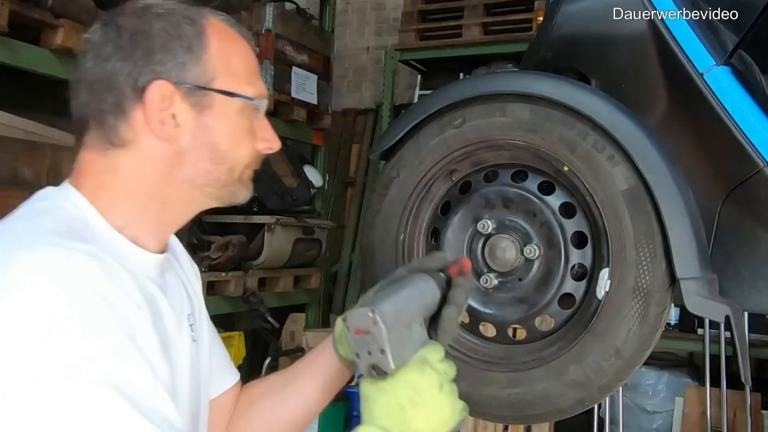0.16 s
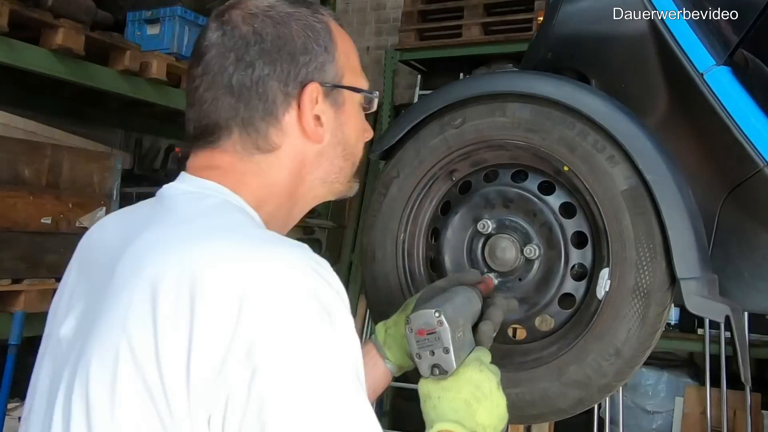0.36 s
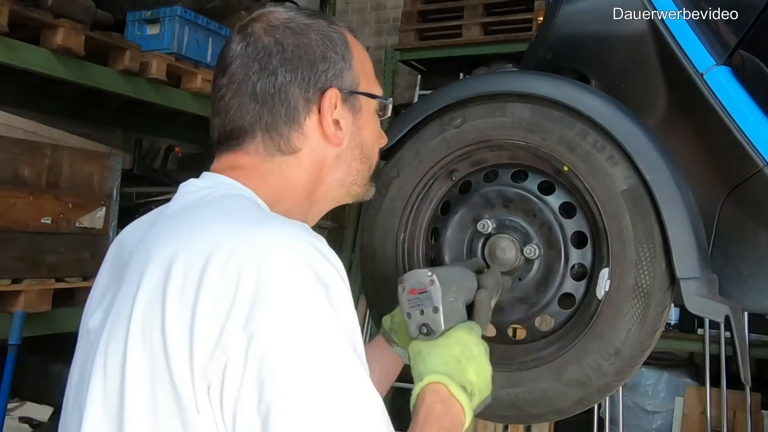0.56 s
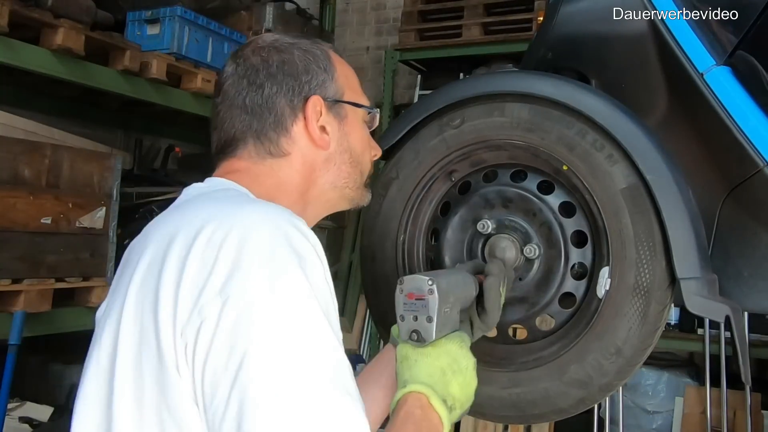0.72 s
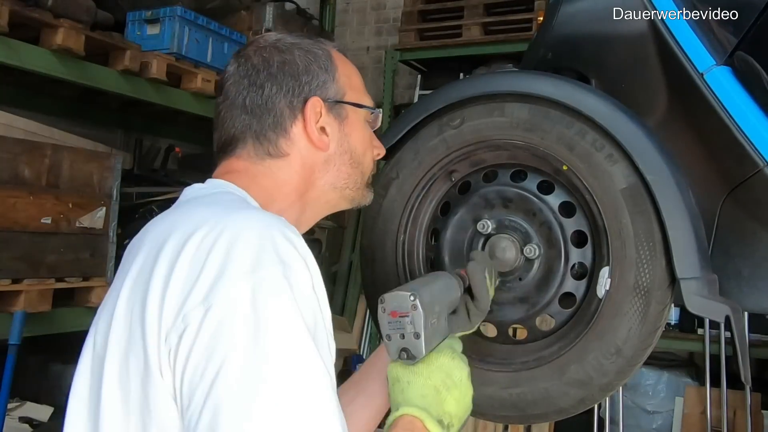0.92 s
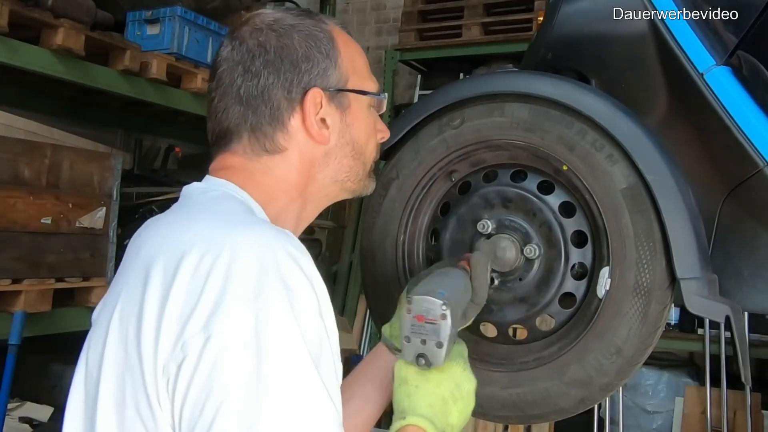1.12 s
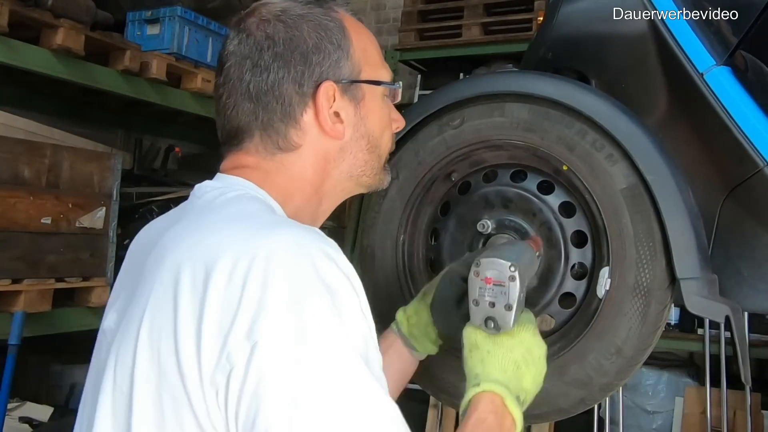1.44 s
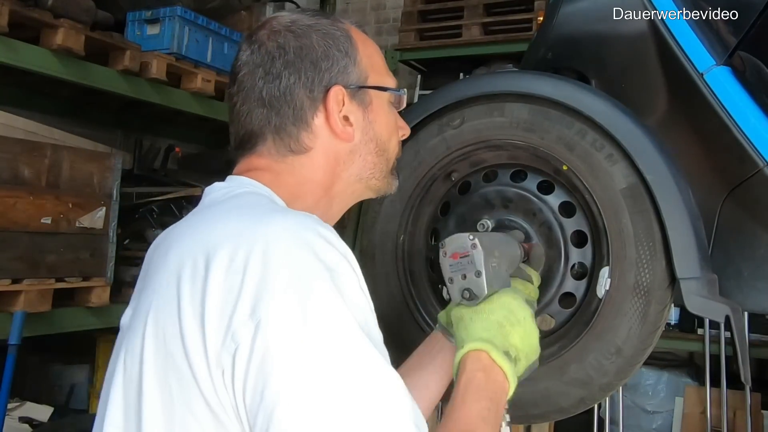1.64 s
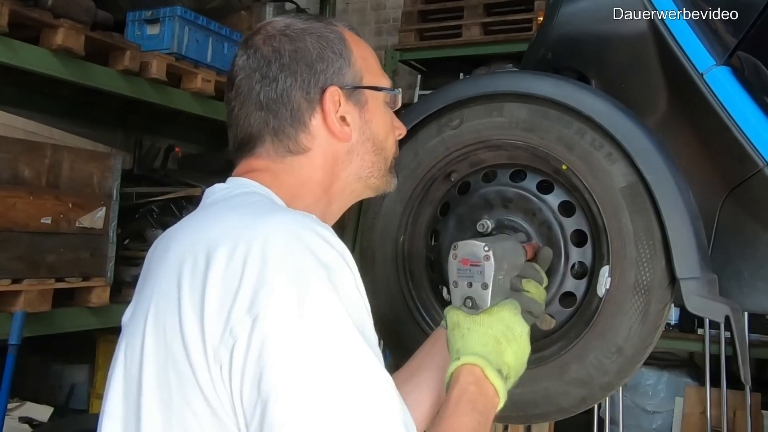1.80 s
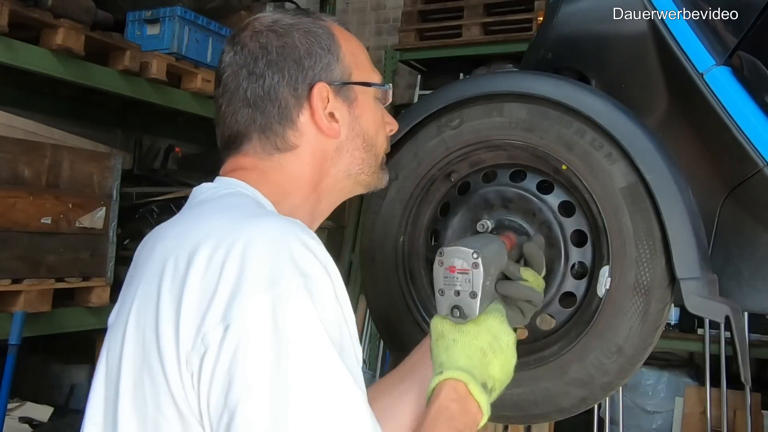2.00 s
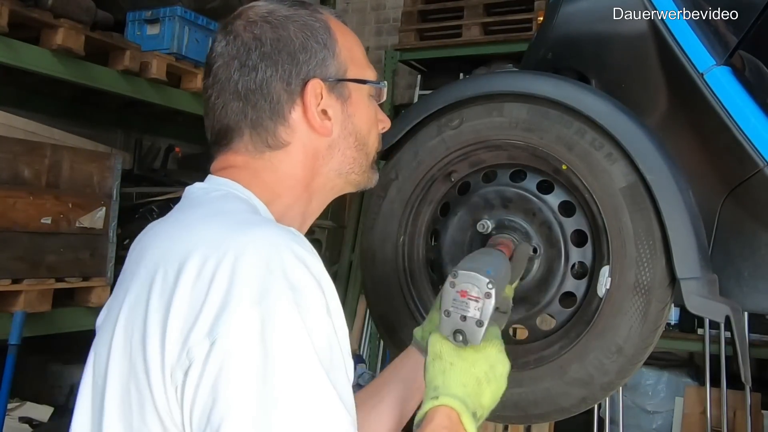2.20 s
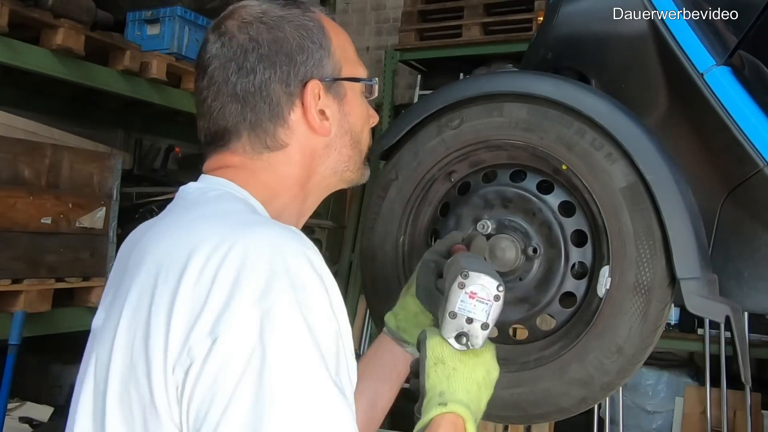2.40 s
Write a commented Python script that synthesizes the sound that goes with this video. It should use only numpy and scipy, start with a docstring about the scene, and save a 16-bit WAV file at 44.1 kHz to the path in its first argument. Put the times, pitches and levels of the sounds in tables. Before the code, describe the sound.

Two brief hammering, whining bursts from a cordless impact wrench, with light metal knocks beforehand.

```python
"""A cordless impact wrench, close to the microphone, spins two wheel bolts loose in a reverberant garage.
The socket clicks and knocks onto each bolt; the motor kicks in and the hammer strikes the anvil four
hard blows, then rattles lightly as the motor whines up to speed and is braked to a stop.
Something clacks farther off. Rubbing, low rumble and soft hiss lie underneath, almost in mono."""
import sys
import numpy as np
from scipy import signal
from scipy.fft import rfft, irfft
from scipy.io import wavfile

SR = 44100
rng = np.random.default_rng(int(sys.argv[2]) if len(sys.argv) > 2 else 0)


def store_pcm(level_fs):
    """Save levels as 16-bit WAV."""
    pcm = np.round(np.clip(level_fs, -1, 1) * 32767).astype(np.int16)
    wavfile.write(sys.argv[1], SR, np.atleast_2d(pcm).T)


N = 112454
T = np.arange(N) / SR
HIT_T = T[:SR // 3]  # time within one hit

# hammer blows, close up (time [s], crack [dB], tilt [dB/octave], thump [dB], ring [dB], hold [s])
HAMMER_BLOWS = [(.6860, -12.5, -0.5, -29, -29, .005), (0.698, -17.5, -2, -28, -23, 0.0011),
                (0.7019, -2, -1, -10.5, -42, 0.0016), (0.7238, 1, -0.5, -24, -32, 0.0027),
                (0.7422, -7.5, 1, -32, -13, 0.00157), (0.755, -5, 0.5, -7.5, -19, 0.0027),
                (0.778, -11.5, 0, -26.5, -25, .002), (0.7996, -12, -2.5, -36, -38, .002),
                (0.822, -13, -1.5, -34, -34, .003), (.8454, -16.5, -0.5, -33, -35, 0.0029),
                (0.873, -24.5, 0, -27.5, -31, .002), (0.9025, -21.5, 3, -36, -30, 0.0013),
                (1.7587, -14.5, -2.5, -21.5, -19, 0.0058), (1.7741, 0, 2, -16.5, -19, 0.0036),
                (1.7977, -2.5, 0.5, -17, -9.5, 0.0019), (1.8148, -7.5, 1.5, -13.5, -31, .003),
                (1.8289, -9.5, -0.5, -14, -13, 0.0025), (1.8468, -17, 1, -27, -28, .002),
                (1.87, -14, -1.5, -25, -33, 0.0017), (1.8947, -17, 0, -32.5, -32, 0.0011),
                (1.919, -19, -2, -39, -36, 0.00083)]
# spectrum of the steel crack (frequency [Hz], level [dB])
CRACK_COLOUR = [(100, 0.5), (500, -1.5), (1000, -4.5), (1800, -6), (3000, -1), (4200, -3), (6000, -4.5),
                (9000, 3), (11500, 0), (13500, -1), (16000, 4)]
# modes of anvil and socket (frequency [Hz], level [dB], t60 [s])
ANVIL_MODES = [(6073, 3.5, 0.026), (6287, 1.5, 0.024), (7320, -4, .015), (8230, -3.5, .02),
               (9100, 1.5, 0.022), (9400, -6, 0.022), (11030, -4.5, .06), (14700, -15, .04)]
THUMP_HZ, THUMP_FALL_S, THUMP_BOOST_DB = 130.6, 0.0026, 3.5


def hammer():
    """Each blow on the anvil is a steel crack, a low recoil and the ring of anvil and socket."""
    out = np.zeros(N)
    thump = np.sin(2 * np.pi * THUMP_HZ * HIT_T) * np.exp(-HIT_T / THUMP_FALL_S)
    for s, crack_db, tilt_db, thump_db, ring_db, hold_s in HAMMER_BLOWS:
        crack = amp(crack_db) * burst(CRACK_COLOUR, hold_s, fall_s=0.0021, tilt_db=tilt_db)
        recoil = -amp(THUMP_BOOST_DB + thump_db) * thump
        anvil = amp(ring_db) * ring(ANVIL_MODES, spread=0.0101)
        add(out, s, crack + recoil + anvil)
    return out


# the motor's fundamental on each bolt (time [s], pitch [Hz], level [dB])
FIRST_RUN = [(.716, 319.2, -25), (.731, 418.7, -18), (.750, 522.6, -28), (.769, 718.6, -23.5),
             (.790, 882.5, -26), (.812, 970, -32.5), (.850, 1052, -34), (.897, 1164, -36.5),
             (.908, 1010, -28.5), (.930, 808.7, -22.5), (.948, 644.7, -20), (.970, 470, -25),
             (.990, 351.2, -25.5), (1.012, 254, -37), (1.05, 150, -53)]
SECOND_RUN = [(1.795, 299.4, -17), (1.809, 393.6, -21), (1.821, 469, -27), (1.839, 679.6, -22),
              (1.860, 855, -28), (1.878, 957.6, -29), (1.898, 1014, -31), (1.917, 1083, -40.5),
              (1.932, 968.4, -27.5), (1.960, 747, -22.5), (1.978, 604, -21.5), (2.000, 443, -25),
              (2.022, 337, -28.5), (2.060, 223, -40.5), (2.1, 140, -57)]
# overtones 2 to 7 (level at full power [dB], level against the fundamental while braking [dB])
OVERTONES = [(-36.5, -1.5), (-52, -7.5), (-36.5, -12.5), (-36.5, -14.5), (-42.5, -17), (-43, -20)]
# the casing's added colour on the overtones while braking (frequency [Hz], level [dB])
CASING_COLOUR = [(300, 0), (700, -14.5), (1200, -10), (1600, -5), (2050, -4), (2500, -1), (2900, 11),
                 (3350, -29.5), (4050, 8), (5400, -9), (7500, 2)]
# spectrum of the gear hiss (frequency [Hz], level [dB])
GEAR_COLOUR = [(100, 17), (400, -4.5), (1500, 8), (2800, 20), (4000, 12.5), (5500, 11.5), (9000, -10.5),
               (16000, -3.5)]
MOTOR_TRIM_DB, GEAR_DB = -2.5, -38
WOBBLE_DEPTH, WOBBLE_HZ, FLUTTER_DB, FLUTTER_HZ = 0.02185, 139.4, 3, 70


def motor(run):
    """A whine with overtones and gear hiss; it climbs under power and falls under the brake."""
    times, pitches, levels = np.transpose(run)
    hz = np.interp(T, times, pitches)
    level = amp(MOTOR_TRIM_DB + np.interp(T, times, levels))
    speed = hz / pitches.max()
    gate = np.clip((T - times[0]) / 0.0053, 0, 1) * np.clip((times[-1] - T) / 0.0069, 0, 1)
    braking = np.clip((T - times[pitches.argmax()]) / .008, 0, 1)
    roughness = 1 - 0.47 * braking  # steadier under the brake
    wobble = WOBBLE_DEPTH * roughness * wander(WOBBLE_HZ)
    phase = 2 * np.pi * np.cumsum(hz * (1 + wobble)) / SR
    whine = level * amp(FLUTTER_DB * roughness * wander(FLUTTER_HZ)) * np.sin(phase)
    for k, (drive_db, brake_db) in enumerate(OVERTONES, 2):
        driven = (1 - braking) * amp(drive_db) * speed ** 1.1
        braked = braking * level * amp(brake_db + read(CASING_COLOUR, k * hz))
        flutter = amp(FLUTTER_DB * wander(FLUTTER_HZ))
        whine += (driven + braked) * flutter * np.sin(k * phase + 2 * np.pi * rng.random())
    hiss = amp(GEAR_DB) * speed ** 1.2 * noise(GEAR_COLOUR, N) * (1 + .5 * np.sin(phase))
    return gate * (np.sqrt(2) * whine + hiss)


# jolts as the motor takes up the load (time [s], level [dB])
HOUSING_JOLTS = [(.690, -19), (0.7125, -4.5), (1.768, -16), (1.7843, -7)]
# modes of the housing (frequency [Hz], level [dB], t60 [s])
HOUSING_MODES = [(289, 2, 0.039), (397, -5.5, 0.0534), (571, -7, 0.087), (661.3, -4, .06)]
# gears under load (time [s], length [s], level [dB])
GEAR_LOADS = [(0.681, 0.081, -21.5), (1.755, 0.075, -20)]
# spectrum of their grinding (frequency [Hz], level [dB])
GRIND_COLOUR = [(25, 3), (60, -21.5), (140, -5.5), (300, 8.5), (650, 5), (1100, -0.5), (1700, -19),
                (3000, -11.5), (7000, -17.5), (16000, -18)]


def strain():
    """The housing jolts and the gears grind while the bolt still holds."""
    out = np.zeros(N)
    for s, db in HOUSING_JOLTS:
        add(out, s, -amp(db) * ring(HOUSING_MODES) * attack(0.0012))
    for s, length_s, db in GEAR_LOADS:
        onset = np.clip((T - s) / 0.0066 + .5, 0, 1)
        release = np.exp(-np.maximum(T - s - length_s, 0) / .012)
        out += amp(db) * noise(GRIND_COLOUR, N) * onset * release
    return out


# thin steel pings at the wheel (time [s], frequency [Hz], level [dB], t60 [s])
BOLT_CHINKS = [(.940, 8660, -27, 0.096), (.952, 11430, -23, .06), (.994, 12410, -41, .03),
               (1.972, 5240, -23, 0.043)]


def bolt_chinks():
    """The loosened bolt chinks in the slowing socket."""
    out = np.zeros(N)
    for s, hz, db, t60 in BOLT_CHINKS:
        add(out, s, ring([(hz, db, t60)]))
    return out


# knocks at the wheel (time [s], level [dB], tilt [dB/octave], ring [dB], rise [s])
SOCKET_KNOCKS = [(0.3782, -28.5, 3, -48, .0005), (0.3851, -4.5, 3.5, -8.5, 0.00044),
                 (.4050, -33, -12, -20, .002), (0.419, -25, -25, -16.5, 0.0027),
                 (0.4381, -10, 8, -15, 0.00016), (0.4986, -11.5, -3.5, -18, 0.0015),
                 (.5080, -14.5, -0.5, -20.5, 0.00053), (.521, -22.5, -6, -20, .001),
                 (.531, -26, 4, -30, .002), (0.5436, -21, 3.5, -37, 0.00081),
                 (0.6315, -13, -3, -12.5, 0.0015), (1.412, -33.5, -4, -51, 0.0014),
                 (1.6247, -12.5, -1.5, -18, 0.0002), (1.635, -20, -5, -42, .001),
                 (1.647, -24, -7.5, -48, 0.00093), (1.714, -26, -9, -42, 0.00074),
                 (1.720, -29.5, -8, -46, 0.00133)]
# spectrum of the contact (frequency [Hz], level [dB])
KNOCK_COLOUR = [(100, -12.5), (400, -17), (900, 2.5), (1400, 4.5), (1900, -4.5), (2600, -1), (3150, 7),
                (3900, -10.5), (5700, -6), (7200, -17.5), (9200, -18), (11000, -25.5), (16000, -27)]
# modes of the socket (frequency [Hz], level [dB], t60 [s])
SOCKET_MODES = [(1381, 2, 0.031), (1530, -10.5, 0.04), (2393, -8, 0.03), (3015, -10.5, 0.041),
                (3213, -6, .03), (1390, -47, 0.21), (3000, -23, 0.33)]


def socket_knocks():
    """The socket knocks on bolt and rim, and rings."""
    out = np.zeros(N)
    for s, db, tilt_db, ring_db, rise_s in SOCKET_KNOCKS:
        contact = amp(db) * burst(KNOCK_COLOUR, hold_s=0.0012, fall_s=0.0039, tilt_db=tilt_db)
        socket = amp(ring_db) * ring(SOCKET_MODES, spread=0.013)
        add(out, s, (contact + socket) * attack(rise_s))
    return out


# light clicks near the microphone (time [s], level [dB], tilt [dB/octave], fall [s])
HANDLING_CLICKS = [(.029, -35, -5.5, 0.0045), (.039, -25.5, -2, 0.0016), (0.09, -26.5, -6.5, 0.0017),
                   (0.167, -21.5, 1.5, 0.0015), (.941, -24, -1, 0.0063), (.955, -25.5, 2.5, 0.0043),
                   (0.9944, -20, 10, 0.0011), (1.008, -27.5, -1, 0.00171), (1.185, -19.5, 5, 0.00078),
                   (1.315, -24.5, 1, 0.0013), (1.395, -39, -4, 0.0078), (1.417, -36.5, -2, 0.011),
                   (1.496, -35, -6.5, 0.0027), (1.503, -37, -4.5, 0.0047), (1.568, -28, 0, .001),
                   (1.58, -27.5, -0.5, 0.0016), (1.696, -35, -6, 0.02), (1.9767, -22.5, 1, 0.0023),
                   (2.310, -34, -1.5, 0.0053)]
# spectrum of a click (frequency [Hz], level [dB])
CLICK_COLOUR = [(100, -28.5), (1000, -16), (3000, 1), (5500, 1.5), (10000, -0.5), (16000, 0.5)]


def handling_clicks():
    """Small parts click as the tool is handled."""
    out = np.zeros(N)
    for s, db, tilt_db, fall_s in HANDLING_CLICKS:
        click = burst(CLICK_COLOUR, hold_s=0.002, fall_s=fall_s, tilt_db=tilt_db)
        add(out, s, amp(db) * click * attack(0.00072))
    return out


# spectrum of the clack across the garage (frequency [Hz], level [dB])
CLACK_COLOUR = [(88, -25.5), (150, 2.5), (484, -1.5), (774, -8), (1390, -13), (3420, -3), (4490, -4.5),
                (7040, 0.5), (13400, -7.5), (16000, -13)]


def far_clack():
    """Something clacks farther from the microphone: a short hit with a softer tail."""
    out = np.zeros(N)
    hit = amp(-18) * burst(CLACK_COLOUR, hold_s=0.0022, fall_s=.004)
    tail = amp(-24.5) * burst(CLACK_COLOUR, hold_s=.004, fall_s=0.039)
    add(out, .217, hit + tail)
    return out


# the garage's reverberation time (frequency [Hz], t60 [s])
GARAGE_T60 = [(100, 0.01), (400, 0.2), (1000, 1.34), (2500, 1.8), (6000, 1.76), (10000, 1), (16000, 0.73)]
# colour of its tail (frequency [Hz], level [dB])
GARAGE_COLOUR = [(60, -15), (250, 4), (600, -3.5), (1200, -1.5), (2000, 2), (2900, -2), (3400, -6.5),
                 (5000, -2), (6200, -7.5), (8000, -6), (16000, 1)]
TAIL_DB, EARLY_DB, EARLY_FALL_S, REFLECTIONS_PER_S = -14, -15, 0.016, 1500


def garage(x):
    """Quick reflections from wheel and car body reach the microphone, then a long bright tail."""
    hz, t, spectrum = signal.stft(rng.standard_normal(SR * 3 // 2), SR, nperseg=256)
    spectrum *= amp(read(GARAGE_COLOUR, hz)[:, None] - 60 * t / read(GARAGE_T60, hz)[:, None])
    tail = signal.istft(spectrum, SR, nperseg=256)[1]
    tail *= np.minimum(T[:len(tail)] / 0.03, 1)
    early = rng.standard_normal(len(HIT_T)) * (rng.random(len(HIT_T)) < REFLECTIONS_PER_S / SR)
    early *= (HIT_T > .003) * np.exp(-HIT_T / EARLY_FALL_S)
    return amp(TAIL_DB) * reflect(x, tail) + amp(EARLY_DB) * reflect(x, early)


def wall_echo(x, delay_s=.06, fall_s=0.034, db=-16.5):
    """The far wall scatters back a late cluster of dull reflections."""
    out = np.zeros(N)
    cluster = rng.standard_normal(len(HIT_T)) * np.exp(-HIT_T / fall_s)
    dull = signal.sosfilt(signal.butter(2, [250, 800], "bandpass", fs=SR, output="sos"), x)
    add(out, delay_s, reflect(dull, cluster))
    return amp(db) * out


# course of the rubbing, the low rumble and the hiss (time [s], level [dB])
RUB_LEVEL = [(0, -58), (.36, -56), (.48, -37), (.55, -36.5), (.62, -44), (.67, -37.5), (.75, -73),
             (1.35, -80), (1.52, -55.5), (1.65, -45.5), (1.74, -45), (1.85, -75)]
RUMBLE_LEVEL = [(0, -35), (.3, -41.5), (.4, -44), (.66, -44), (.75, -49), (.88, -48), (.95, -72),
                (1.35, -63), (1.74, -55), (1.79, -33), (1.92, -56), (2.05, -72.5), (2.55, -64)]
HISS_LEVEL = [(0, -45), (.35, -42.5), (.7, -50), (1.3, -54.5), (2.55, -54.5)]
# their spectra (frequency [Hz], level [dB])
RUB_COLOUR = [(30, -10), (120, -3.5), (200, -8.5), (320, 2), (480, -14.5), (1000, -15.5), (3000, -32),
              (7000, -23), (16000, -34)]
RUMBLE_COLOUR = [(15, 1), (35, 8.5), (55, 3), (80, -10.5), (150, -25), (300, -23.5), (900, -49),
                 (4000, -90)]
HISS_COLOUR = [(59, -32), (100, -2.5), (328, -7.5), (570, -4.5), (721, -9), (970, -3.5), (1420, -8),
               (3190, -7.5), (16000, -16)]


def background():
    """Socket and gloves rub as the tool is lined up, over a room tone of low rumble and soft hiss."""
    layers = [(RUMBLE_LEVEL, RUMBLE_COLOUR), (RUB_LEVEL, RUB_COLOUR), (HISS_LEVEL, HISS_COLOUR)]
    return sum(amp(np.interp(T, *np.transpose(level))) * noise(colour, N) for level, colour in layers)


def amp(db):
    """Decibels to gain."""
    return 10 ** (np.asarray(db) / 20)


def unit(x):
    """Scales to rms 1."""
    return x / np.sqrt(np.mean(x ** 2) + 1e-20)


def read(points, hz):
    """Reads a table on a log-frequency axis."""
    frequencies, values = np.transpose(points)
    return np.interp(np.log(hz + 1), np.log(frequencies + 1), values)


def add(mix, s, sound):
    """Mixes a sound in at time s."""
    part = mix[max(round(s * SR), 0):][:len(sound)]
    part += sound[:len(part)]


def noise(colour, size, tilt_db=0):
    """Coloured noise of rms 1, tilted by tilt_db per octave above 700 Hz."""
    hz = np.fft.rfftfreq(size, 1 / SR)
    gain = amp(read(colour, hz) + tilt_db * np.log2(np.maximum(hz, 700)))
    return unit(irfft(rfft(rng.standard_normal(size)) * gain, size))


def wander(hz):
    """Random drift of rms 1, low-passed at hz."""
    return unit(signal.sosfilt(signal.butter(2, hz, fs=SR, output="sos"), rng.standard_normal(N)))


def attack(rise_s):
    """The linear onset of a hit."""
    return np.minimum(HIT_T / rise_s, 1)


def burst(colour, hold_s, fall_s, tilt_db=0):
    """Contact noise: sharp attack, short hold, exponential fall."""
    envelope = attack(0.00048) * np.exp(-np.maximum(HIT_T - hold_s, 0) / fall_s)
    return envelope * noise(colour, len(HIT_T), tilt_db)


def ring(modes, spread=0.0074):
    """Dying modes, tuned a little differently at every blow."""
    out = np.zeros(len(HIT_T))
    for hz, db, t60 in modes:
        detuned_hz = hz * (1 + spread * rng.standard_normal())
        out += amp(db - 60 * HIT_T / t60) * np.sin(2 * np.pi * detuned_hz * HIT_T)
    return out


def reflect(x, echoes):
    """Convolves a sound with echoes scaled to unit energy."""
    return signal.fftconvolve(x, echoes / np.linalg.norm(echoes))[:N]


# faint phase-shifted copy that slightly widens the near-mono image (frequency [Hz], level [dB])
SHIFTED_COPY = [(60, -23.5), (500, -31.5), (1500, -49), (5000, -45.5), (15000, -32.5)]


def scene():
    """Wrench and wheel straight ahead of the microphone in the garage, heard almost in mono."""
    direct = motor(FIRST_RUN) + motor(SECOND_RUN) + hammer() + strain() + bolt_chinks()
    direct += socket_knocks() + handling_clicks() + far_clack()
    mid = direct + garage(direct) + background() + wall_echo(direct)
    copy_gain = amp(read(SHIFTED_COPY, np.fft.rfftfreq(N, 1 / SR)))
    shifted = irfft(1j * rfft(mid) * copy_gain, N)  # a quarter cycle from the mid
    return np.array([mid + shifted, mid - shifted])


def record(dry, ceiling=1.25, edge_hz=16100):
    """The loudest peaks are rounded off, then the highest treble is cut."""
    limited = dry / (1 + (dry / ceiling) ** 4) ** (1 / 4)
    lowpass = signal.firwin(511, edge_hz, window=("kaiser", 9), fs=SR)
    return signal.oaconvolve(limited, lowpass[None], "same")


dry = scene()
out = record(dry)
store_pcm(out)
```